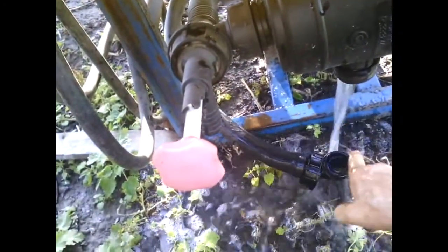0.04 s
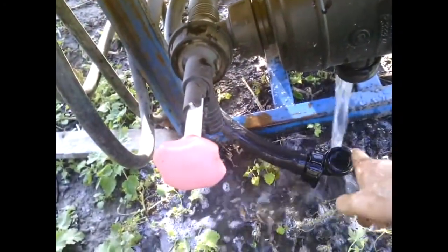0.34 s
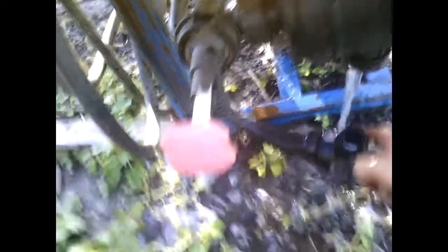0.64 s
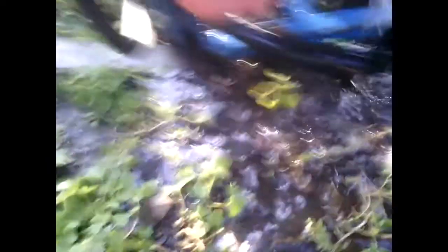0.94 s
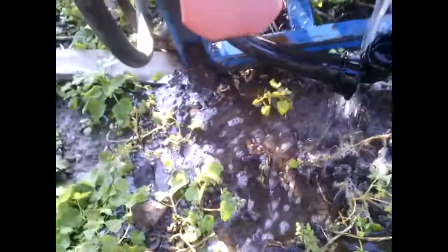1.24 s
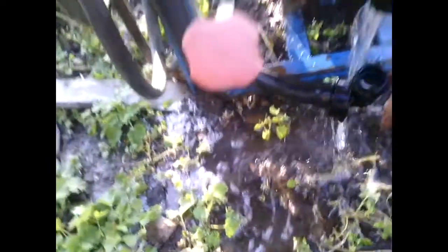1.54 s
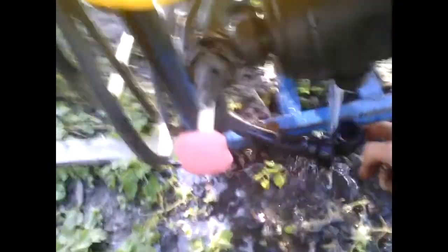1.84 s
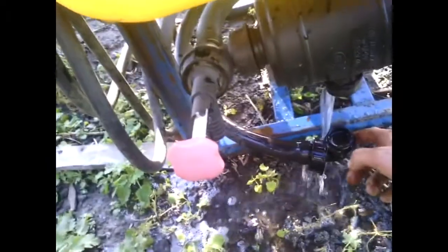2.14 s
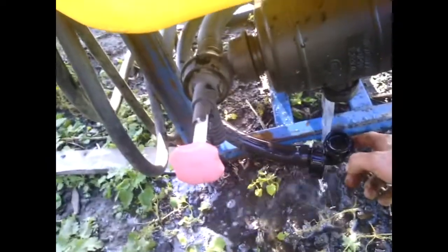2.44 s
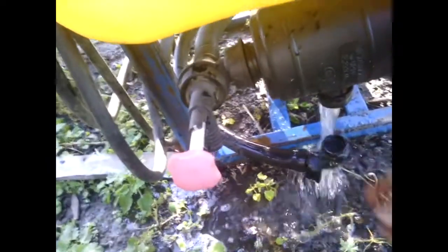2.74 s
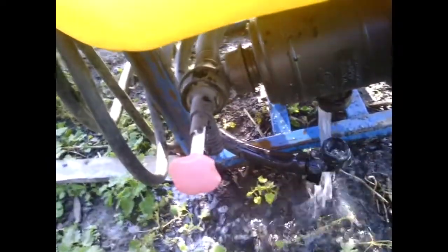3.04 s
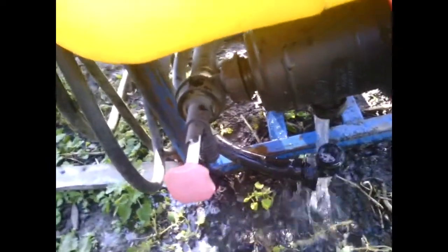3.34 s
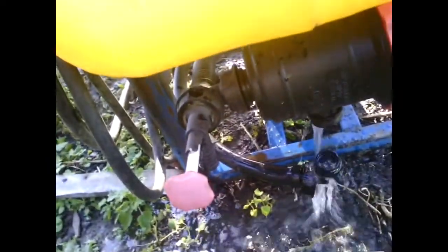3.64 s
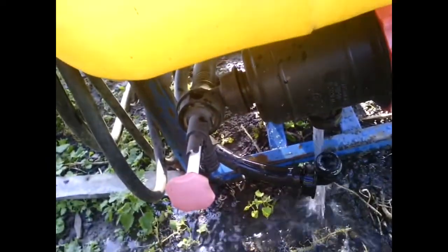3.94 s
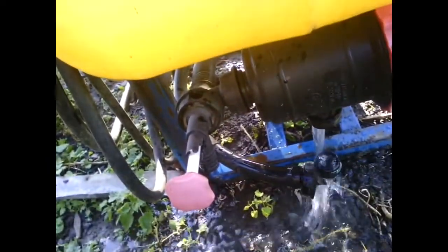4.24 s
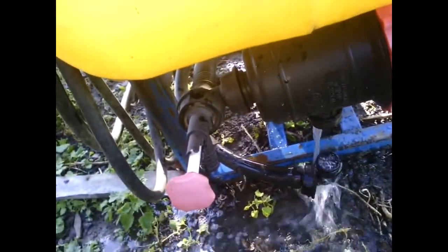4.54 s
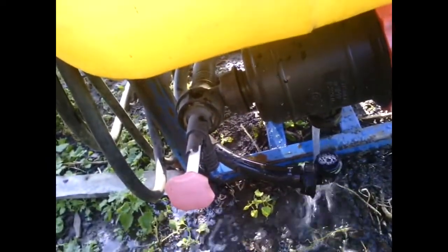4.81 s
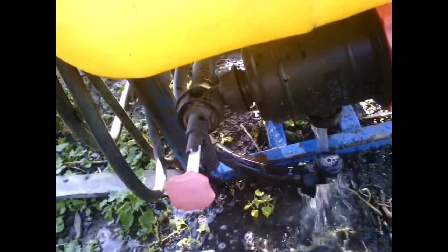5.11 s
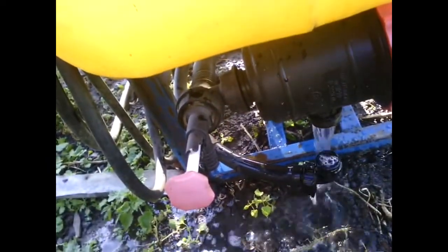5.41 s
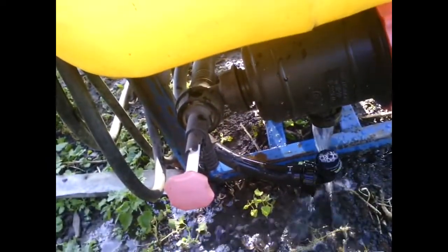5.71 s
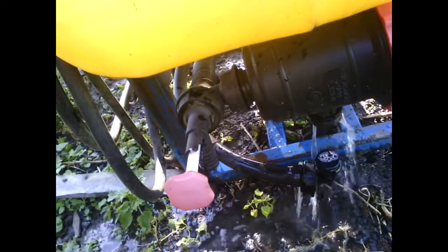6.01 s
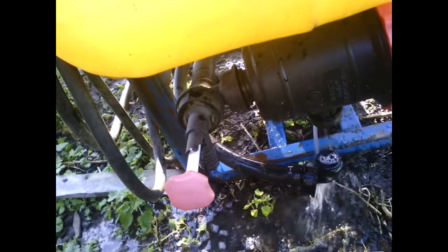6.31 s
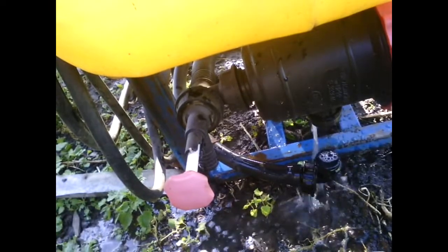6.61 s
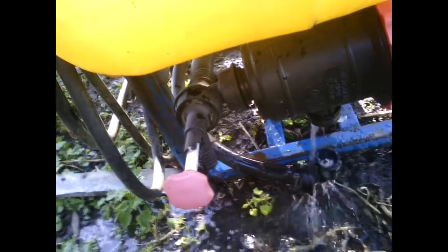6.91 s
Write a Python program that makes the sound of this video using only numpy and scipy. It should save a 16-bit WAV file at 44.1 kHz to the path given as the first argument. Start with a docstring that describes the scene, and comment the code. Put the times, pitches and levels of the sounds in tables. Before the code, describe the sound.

A close, uneven stream of water patters and splashes on wet ground throughout, ringing slightly as it strays into a hose mouth and over a fitting. Early on comes a quick cluster of handling clicks on the microphone, then one more knock. Later, faint hollow plastic booms and small bubbling plops join the splashing, while light wind gives short low thumps in the quiet outdoor air.

```python
"""Outdoors on wet soil, water runs out of an opened pump filter. The jet breaks on a hose fitting and
spatters on the ground, big lumps of water slap down, and bubbles ring in a puddle.
Fingers knock on a hand-held camera and its case rings; light wind puffs on the microphone.
A hollow plastic part booms softly now and then, and something whistles faintly far away."""
import sys
import numpy as np
from scipy import signal
from scipy.fft import rfft, irfft, next_fast_len
from scipy.io import wavfile
from scipy.ndimage import uniform_filter1d, map_coordinates

SR = 44100
rng = np.random.default_rng(int(sys.argv[2]) if len(sys.argv) > 2 else 0)


def generate_wav(sig):
    """Save sig (samples, or channels by samples) to the path in sys.argv[1] as 16-bit PCM at SR."""
    pcm = np.round(np.clip(np.atleast_2d(sig).T, -1, 1) * 32767).astype(np.int16)
    wavfile.write(sys.argv[1], SR, pcm)


N = 306936

# A tone table sets the balance of low and high sound. A ring time is the time to fade by 60 dB.
# tone of the outdoor air: frequency_hz, level_db
AIR_TONE = [(20, -13), (70, 5), (150, 0), (400, 2), (1000, -6.5), (4000, -7.5), (10000, -5.5), (14000, -6),
            (16000, -7.5)]
# tone of a faint, bright hiss: frequency_hz, level_db
HISS_TONE = [(200, 2), (2000, -5), (5500, -9), (9000, 6.5), (14000, 12.0)]
# the far whistle: time_s, pitch_hz, level_db
WHISTLE_PATH = [(3.965, 1520, -61), (4.02, 1503, -60.5), (4.22, 1500, -64.5), (4.29, 1514, -71),
                (4.36, 1506, -61), (4.51, 1524, -62)]

# tone of wind on the microphone: frequency_hz, level_db
WIND_TONE = [(20, -46), (40, -28), (70, 0.5), (120, -0.5), (200, -6), (300, -22), (500, -63), (1000, -52)]
# breaths of wind: start_s, length_s, level_db
WIND_GUSTS = [(0.8, 0.29, -57.5), (1.98, 0.11, -58), (2.33, 0.12, -68), (3.06, 0.27, -58),
              (3.85, 0.13, -59), (4.5, 0.22, -65), (4.92, 0.22, -57.5), (5.44, 0.15, -53.5),
              (6.5, 0.75, -55.5)]
# short low thumps on the microphone (puffs of wind and a dull handling bump): time_s, level_db, pitch_hz
LOW_THUMPS = [(0.891, -33, 132), (0.997, -29, 111), (1.039, -22, 220), (2.123, -35, 104),
              (3.058, -30.5, 138), (3.091, -28, 390), (3.105, -28.5, 303), (3.129, -27, 210),
              (3.186, -32.5, 119), (3.331, -43, 134), (3.882, -35, 133), (3.925, -35, 145), (4.13, -42, 92),
              (4.641, -38, 110), (4.669, -33.5, 125), (5, -26, 143), (5.106, -33.5, 124), (5.43, -30, 122),
              (5.462, -33, 125), (5.511, -32.5, 134), (5.528, -40, 90), (5.55, -33, 161),
              (6.515, -30.5, 160), (6.54, -35, 115), (6.564, -37, 90), (6.617, -33, 142), (6.645, -36, 105),
              (6.688, -24.5, 128), (6.775, -40, 105), (6.809, -30, 180), (6.849, -36, 132),
              (6.936, -34, 189), (6.948, -37, 96)]

# tone of the plastic part's hum: frequency_hz, level_db
HUM_TONE = [(150, -19), (255, -15), (298, -3.0), (335, -15.0), (400, -22), (700, -32.5)]
# notes the plastic part rings at: pitch_hz, level_db, ring_s
PLASTIC_NOTES = [(296, 11, 0.36), (272, -17, 0.59), (320, 5, 0.1)]
# its soft booms: start_s, level_db, rise_s
PLASTIC_BOOMS = [(3.279, -48.5, 0.0069), (3.479, -65, 0.013), (3.801, -51, 0.0077), (4.107, -53.5, 0.013),
                 (4.675, -42, 0.014), (5.141, -48, 0.0086), (5.39, -53, 0.01), (5.74, -51, 0.019)]

# fingers knocking on the camera: start_s, click_db, case_db, treble_limit_hz
FINGER_KNOCKS = [(.930, -26, -26.5, 5000), (0.9724, -17.5, -40, 12100), (0.9775, -20, -38, 6000),
                 (0.9836, -25, -44, 9000), (0.993, -25, -37, 5000), (0.997, -12, -27, 4000),
                 (1.034, -25, -26, 4000), (1.043, -26, -29, 12000), (1.044, -2, -19.5, 13600),
                 (1.063, -24.5, -35.5, 6000), (1.117, -45, -41, 5000), (1.9791, -18.5, -21.5, 3500)]
# notes in a finger's click: pitch_hz, level_db, ring_s
CLICK_NOTES = [(1330, -8, 0.0063), (2120, 3.5, 0.0032), (4100, 7.5, 0.0028), (5110, -1.5, 0.0037),
               (6470, -4.5, 0.0042), (7400, -7, 0.0037), (10650, -9, 0.0019)]
# notes the camera's case rings at: pitch_hz, level_db, ring_s
CASE_NOTES = [(339.4, 7, 0.12), (303, -12, 0.086), (490, -6, 0.0093), (744, 7, 0.016), (1046, -5.5, 0.027)]
# the hand shifts its grip: start_s, length_s, level_db
GRIP_RUBS = [(0.79, 0.29, -55.5), (1.7, 0.31, -59), (3.09, 0.048, -56), (6.53, 0.039, -58.5)]
# tone of that rubbing: frequency_hz, level_db
RUB_TONE = [(120, -29), (270, -13), (335, 1.5), (420, -15.5), (600, -10.5), (1000, -5.5), (1400, -24),
            (3000, -45)]
# a finger drags past the microphone: start_s, length_s, level_db
FINGER_SCRAPES = [(0.981, 0.004, -39), (1.010, 0.007, -40), (1.036, 0.005, -38)]
# tone of that scraping: frequency_hz, level_db
SCRAPE_TONE = [(300, -2), (1000, -3), (2500, -3), (5000, -3), (6500, -8), (8500, -5), (14000, -35)]

# large bubbles closing in the puddle: start_s, level_db, pitch_hz, climb_share_per_s
BIG_BUBBLES = [(2.162, -48, 1415, 2.3), (3.018, -41.5, 1486, 2.9), (3.1384, -39.5, 2155, 4.3),
               (4.3943, -38, 2400, 3.9), (4.415, -44, 1570, 4.3), (4.435, -44.5, 1110, 1),
               (4.534, -46, 1525, 3.7), (4.694, -44.5, 1700, 2), (5.689, -41.5, 1405, 14.5),
               (6.168, -42, 2360, 3.4), (6.203, -43.5, 2610, 1.1)]
# the biggest lumps of water slapping down: start_s, peak_db, pitch_hz
BIG_SLAPS = [(0.053, -31, 3500), (0.159, -34, 4100), (0.167, -32, 3770), (0.4163, -34, 4200),
             (0.557, -29, 3150), (0.6256, -32, 2630), (0.6727, -32.5, 2180), (0.827, -32, 4130),
             (1.204, -23.5, 2675), (1.255, -27, 5070), (1.3114, -26, 4760), (1.315, -23.5, 4510),
             (1.325, -29, 4060), (1.4354, -27, 3970), (1.5062, -27, 3550), (1.7989, -22, 2900),
             (1.8025, -26, 3300), (1.855, -31, 4000), (1.9125, -29, 4180), (2.058, -29.5, 3930),
             (2.104, -29.5, 4040), (2.139, -36, 4100), (2.1683, -33, 5870), (2.1834, -31, 2890),
             (2.2114, -31.5, 4000), (2.3175, -27.5, 3770), (2.505, -25, 3950), (2.5471, -28.5, 3850),
             (2.742, -28, 4230), (2.763, -30.5, 2950), (2.7958, -26.5, 6400), (2.8393, -31, 5050),
             (2.898, -30, 5330), (3.1056, -28.5, 4200), (3.2132, -27.5, 4300), (3.38, -28, 3160),
             (3.4552, -24, 3930), (3.5771, -25.5, 3170), (3.9032, -29.5, 4860), (3.943, -28, 6470),
             (4.0238, -26, 4800), (4.175, -26, 4180), (4.278, -26, 3550), (4.315, -28.5, 4540),
             (4.329, -22, 3520), (4.375, -29.5, 4490), (4.512, -30, 5270), (4.525, -23.5, 3240),
             (4.5983, -28, 2770), (4.668, -32, 3950), (4.7544, -30, 4300), (4.775, -29, 3550),
             (4.78, -31, 3670), (5.078, -32, 3980), (5.091, -34, 4080), (5.1974, -35, 3360),
             (5.3165, -25, 4520), (5.4362, -32.5, 3330), (5.5107, -30.5, 3160), (5.8114, -33, 3800),
             (5.9535, -28.5, 4540), (5.988, -29, 4200), (6.05, -30.5, 4130), (6.0955, -33.5, 4500),
             (6.251, -32.5, 4020), (6.311, -35, 5900), (6.3675, -33, 4600), (6.4835, -29.5, 4240),
             (6.68, -30, 3200), (6.782, -24.5, 3900), (6.8194, -30, 5750)]

# how loudly the jet lands: time_s, soil_db, puddle_db
JET_LEVELS = [(0.0, -47, -62), (0.56, -49, -61), (0.97, -43, -66), (1.25, -44.5, -71), (1.55, -48, -61.5),
              (1.96, -44, -71), (2.34, -47.5, -63), (2.79, -45.5, -57), (2.95, -43.5, -51),
              (3.2, -43, -56.5), (3.45, -44.5, -54.5), (3.7, -43, -58), (3.95, -46, -60),
              (4.27, -45.5, -56), (4.48, -43, -61.5), (4.79, -48, -61.5), (5.1, -43, -54.5),
              (5.3, -44, -61.5), (5.5, -47.5, -61.5), (5.65, -50.5, -62), (5.82, -48, -59), (6.2, -50, -65),
              (6.56, -52.5, -61.5), (6.96, -47, -53)]
# tone of the spatter on the soil: frequency_hz, level_db
SPATTER_TONE = [(940, -15), (1600, -6), (2300, -6), (3220, -0.5), (3690, 0), (4220, 0.5), (5710, -6),
                (6480, -4.5), (8490, -12.5), (12000, -18), (15600, -51), (22000, -120)]
# tone of the low splash in the puddle: frequency_hz, level_db
PUDDLE_TONE = [(150, -13), (450, 0.5), (800, 2), (1300, 0.5), (1900, 4), (2600, 0.5), (5000, -37)]
# tone of the fine spray: frequency_hz, level_db
SPRAY_TONE = [(3000, -12), (5500, -2), (7000, -5.5), (9000, -11), (12000, -22), (16000, -23)]
# the jet spurts: start_s, length_s, strength_db
JET_SPURTS = [(3.08, 0.06, -8), (4.25, 0.046, 2), (4.665, 0.06, 4)]
# the jet falters: start_s, length_s, lost_share_db
JET_LULLS = [(2.43, 0.062, -20), (3.3, 0.042, -5), (4.09, 0.06, -7), (4.81, 0.085, -9), (5.37, 0.051, -9),
             (6.28, 0.04, -3), (6.39, 0.04, -9.5)]
# the jet tears into separate drops: start_s, length_s, added_share_db
JET_DRIBBLES = [(2.05, 0.41, -8), (5.95, 0.28, -3)]
# the jet strays into the hose mouth: start_s, length_s, share_db
JET_IN_HOSE = [(0.0, 0.78, -9), (2.0, 0.79, -1.5)]
# notes the hose mouth rings at: pitch_hz, width_hz, level_db
HOSE_NOTES = [(2870, 120, -1), (3330, 150, -3), (4080, 140, 2.5), (5070, 500, -5), (6300, 320, -6)]
# the jet breaks on the fitting: start_s, length_s, share_db
JET_ON_FITTING = [(3.4, 1.32, -3.5), (5.4, 1.7, -2)]
# notes the fitting's hollows ring at: pitch_hz, width_hz, level_db
FITTING_NOTES = [(2520, 160, -0.5), (3245, 160, 4.5), (4100, 230, -7), (4660, 570, -3), (5570, 810, -7),
                 (6470, 740, 2.5)]
# the jet glances off the fitting as fine spray: start_s, length_s, level_db
SPRAY_BURSTS = [(3.52, 0.089, -55.5), (4.25, 0.11, -53.5), (4.67, 0.055, -52), (5.22, 0.043, -52.5),
                (5.73, 0.17, -63.5), (5.98, 0.015, -49)]


def amp(db):
    """Turn decibels into a number to multiply by."""
    return 10 ** (np.asarray(db) / 20)


def unit(x):
    """Scale a sound to an average strength (rms) of 1."""
    return x / np.sqrt(np.mean(x ** 2) + 1e-20)


def curves(rows):
    """Join a table's points with lines: one curve for each column after the time."""
    times, *columns = np.transpose(rows)
    return [np.interp(np.arange(N) / SR, times, column) for column in columns]


def during(rows):
    """Fade in at a table's first time and out by its last."""
    t = np.arange(N) / SR
    return np.clip(np.minimum(t - rows[0][0], rows[-1][0] - t) / 0.022, 0, 1)


def wobble(rate):
    """A smooth curve through rate random points a second."""
    points = rng.standard_normal(int(N * rate / SR) + 4)
    return map_coordinates(points, [np.arange(N) * rate / SR])


def add(track, s, sound):
    """Mix a sound into a track, starting at s seconds."""
    part = track[max(round(s * SR), 0):][:len(sound)]
    part += sound[:len(part)]


def swells(rows, attack, release):
    """A loudness curve for events that rise, hold and die away; attack and release are in seconds."""
    out = np.zeros(N)
    for s, length, db in rows:
        t = np.arange(max(s - 10 * attack, 0), s + length + 10 * release, 1 / SR)
        shape = np.exp(np.minimum(t - s, 0) / attack - np.maximum(t - s - length, 0) / release)
        add(out, t[0], amp(db) * shape)
    return out


def filtered(x, response):
    """Turn each frequency of a sound up or down by response(hz)."""
    size = next_fast_len(N + 8192)
    return irfft(rfft(x, size) * response(np.fft.rfftfreq(size, 1 / SR)), size)[..., :N]


def coloured(x, tone):
    """Shape a sound with a tone table, at strength 1."""
    points_hz, db = np.transpose(tone)
    return unit(filtered(x, lambda hz: amp(np.interp(np.log(hz + 1), np.log(points_hz), db))))


def noise(tone):
    """Noise with the given tone, at strength 1."""
    return coloured(rng.standard_normal(N), tone)


def patchy(x, depth_db):
    """Make patches of pitch flicker, as when air pockets open and close in a splash."""
    bands = signal.stft(x, nperseg=512)[2]
    patches = uniform_filter1d(rng.standard_normal(bands.shape), 5, axis=0)
    patches = uniform_filter1d(patches, 6, axis=1)
    return unit(signal.istft(bands * amp(depth_db * unit(patches)), nperseg=512)[1][:N])


def blend(a, b, share):
    """Mix two sounds at a steady power; share is the part given to b."""
    share = np.clip(share, 0, 1)
    return np.sqrt(1 - share) * a + np.sqrt(share) * b


def ring(notes, rise_s, length=SR // 2):
    """A struck object's notes build up and die away, with a peak of 1."""
    t = np.arange(length) / SR
    sound = sum(amp(db - 60 * t / ring_s) * np.sin(2 * np.pi * hz * t) for hz, db, ring_s in notes)
    sound *= 1 - np.exp(-(t / rise_s) ** 2)
    return sound / np.abs(sound).max()


def resonate(x, notes):
    """A hollow space favours the parts of a sound near its own notes."""
    def response(f):
        return sum(amp(db) * 1j * f * width / (hz * hz - f * f + 1j * f * width)
                   for hz, width, db in notes)
    return unit(filtered(x, response))


def background():
    """Quiet outdoor air, a far whistle and the thin whine of the camera's electronics."""
    hz, db = curves(WHISTLE_PATH)
    whistle_gain = amp(db + 2 + 2.2 * wobble(40)) * during(WHISTLE_PATH)
    wavering_hz = hz * (1 + 0.009 * wobble(90))
    whistle = whistle_gain * unit(np.sin(2 * np.pi * np.cumsum(wavering_hz) / SR))
    whine = amp(-78.5) * np.sin(2 * np.pi * 12897 * np.arange(N) / SR)
    air = amp(-59.0) * patchy(noise(AIR_TONE), depth_db=2.0)
    return air + whistle + whine


def wind_and_thumps():
    """Gusts rumble; puffs of wind and a dull handling bump give short, low thumps on the microphone."""
    thumps, thump_rumble = np.zeros(N), np.zeros(N)
    t = np.arange(-SR // 20, SR // 20) / SR
    for s, db, hz in LOW_THUMPS:
        wave = np.cos(2 * np.pi * (hz * t + rng.uniform()))
        add(thumps, s + t[0], amp(db - 3.5) / np.cosh(t * hz / 0.29) * wave)
        add(thump_rumble, s + t[0], amp(db - 35) * np.hanning(len(t)))
    calm = amp(-72.5)
    gusts = swells(WIND_GUSTS, attack=0.051, release=0.042)
    rumble = (calm + gusts + thump_rumble) * unit(noise(WIND_TONE) * amp(4.3 * wobble(30)))
    bass_cut = signal.butter(3, 48, "highpass", fs=SR, output="sos")  # a tiny microphone misses deep bass
    return signal.sosfilt(bass_cut, thumps + rumble)


def sloshing(x, bend, rate):
    """Moving water sways a pitch by about the share bend, rate times a second."""
    drift = signal.lfilter([1], [1, -np.exp(-10 / SR)], bend * wobble(rate))
    return map_coordinates(x, [np.arange(N) + drift], mode="mirror")


def hollow_plastic():
    """A hollow plastic part hums along with the puddle's splash and booms when water nudges it."""
    puddle_db = curves(JET_LEVELS)[1]
    average_db = puddle_db.mean()
    out = amp(average_db - 9 + 1.43 * (puddle_db - average_db)) * noise(HUM_TONE)
    for s, db, rise_s in PLASTIC_BOOMS:
        add(out, s, amp(db) * ring(PLASTIC_NOTES, rise_s))
    return sloshing(out, bend=0.025, rate=58) * amp(2.5 * wobble(45))  # the level gurgles too


def fingers_on_camera():
    """Fingers click on the camera, rub it and scrape it; its case rings dully."""
    knocks, t = np.zeros(N), np.arange(SR // 8) / SR
    for s, click_db, case_db, treble_limit_hz in FINGER_KNOCKS:
        notes = [(hz * np.exp(rng.normal(0, 0.04)), db, ring_s) for hz, db, ring_s in CLICK_NOTES]
        click = ring(notes, rise_s=0.0004, length=len(t))
        scuff = amp(-25.0 - 60 * t / 0.02) * rng.standard_normal(len(t))
        soft_fingertip = signal.butter(2, treble_limit_hz, fs=SR)  # dulls the click
        touch = signal.lfilter(*soft_fingertip, click + scuff)
        case = ring(CASE_NOTES, rise_s=0.00072, length=len(t))
        add(knocks, s, amp(click_db) * touch / np.abs(touch).max() + amp(case_db) * case)
    rub = swells(GRIP_RUBS, attack=0.033, release=0.037) * noise(RUB_TONE)
    rough_skin = unit(noise(SCRAPE_TONE) * amp(2.3 * wobble(630)))
    scrape = swells(FINGER_SCRAPES, attack=0.002, release=0.003) * rough_skin
    return knocks + rub + scrape


def bubbles(ring_s=0.09):
    """A bubble's pitch climbs as it nears the surface of the shallow puddle."""
    out, t = np.zeros(N), np.arange(SR // 25) / SR
    for s, db, hz, climb in BIG_BUBBLES:
        phase = 2 * np.pi * hz * t * (0.98 + climb * t / 2)
        ripple = np.cumsum(rng.normal(0, 0.11, len(t)))  # the churning puddle jostles the bubble
        loudness = amp(db - 60 * t / ring_s) * (1 - np.exp(-t / 0.00029))
        add(out, s, loudness * np.sin(phase + ripple))
    return out


def slaps(rows, climb_share_per_s=7.3):
    """Each lump of water smacks the ground, rings a small air pocket and scatters droplets."""
    out, t = np.zeros(N), np.arange(SR // 16) / SR
    splash_band = signal.butter(3, [2200, 5800], "bandpass", fs=SR, output="sos")
    for s, db, hz in rows:
        white = rng.standard_normal((2, len(t)))
        near_pitch = signal.lfilter(*signal.iirpeak(hz, 2, SR), white[0])
        churn = unit(signal.lfilter(*signal.iirpeak(hz, 5, SR), near_pitch))
        splash = unit(signal.sosfilt(splash_band, white[1]))
        ring_s = 0.0084 * np.exp(0.54 * rng.standard_normal())  # no two pockets last alike
        chirp = np.sin(2 * np.pi * hz * t * (1 + climb_share_per_s * t / 2))
        pocket = amp(-60 * t / ring_s) * (0.45 * churn + chirp)
        smack = amp(-5.5 - 60 * t / 0.004) * splash
        scatter = amp(-18 - 60 * t / 0.075) * (splash + churn)
        slap = pocket * (1 - np.exp(-t / 0.00027)) + (smack + scatter) * (1 - np.exp(-t / 0.0009))
        add(out, s + 0.0017, amp(db) * slap / np.abs(slap).max())
    return out


def small_slaps(per_s=6, typical_hz=4130):
    """Smaller lumps of water fall at random, louder with the flow up to a limit."""
    soil_db = np.minimum(curves(JET_LEVELS)[0], -47)  # a fast jet tears its lumps finer
    count = int(per_s * N / SR)
    timing, size, pitch = rng.uniform(-1.1, 1, (count, 3)).T
    at = ((np.arange(count) + (1 + timing) / 2) * N / count).astype(int)
    return slaps(zip(at / SR, soil_db[at] + 11 + 3 * size, typical_hz * np.exp(0.336 * pitch)))


def droplets(tone, rate, hz, spread, cycles, size_db, scatter_s, count=3):
    """Water lands in rate lumps a second; each traps count tiny bubbles that ring at similar pitches."""
    lumps = int(rate * N / SR)
    total = lumps * count
    lump_s = np.repeat((np.arange(lumps) + rng.uniform(-1, 1, lumps)) / rate, count)
    start_s = lump_s + rng.exponential(scatter_s, total)
    pitch_offset = np.repeat(rng.standard_normal(lumps), count) + 0.5 * rng.standard_normal(total)
    pitch_hz = np.clip(hz * np.exp(spread * pitch_offset), 400, 13000)
    lump_size = np.repeat(np.minimum(rng.exponential(1, lumps), 2.5), count)
    gain = amp(size_db * (lump_size + np.minimum(rng.exponential(1, total), 2.5)))
    fade_cycles = cycles * np.exp(0.5 * rng.standard_normal(total))
    sample = np.arange(256)
    progress = sample / len(sample)
    turns = pitch_hz[:, None] * sample / SR * (1 + 0.077 * progress)  # the pitch climbs a little
    shape = np.minimum(turns / 0.62, 1) * np.exp(-turns / fade_cycles[:, None]) * (1 - progress)
    pings = (gain * rng.choice([-1, 1], total))[:, None] * shape * np.sin(2 * np.pi * turns)
    at = (np.abs(start_s) * SR).astype(int)[:, None] + sample
    return coloured(unit(np.bincount(at.ravel(), pings.ravel(), N)[:N]), tone)


def filling_hollow(splash, notes, share, bend=0.06):
    """A share of the splash rings in a hollow whose pitch wanders as it fills and spills."""
    fill = np.clip(1 + wobble(13), 0, 2)
    ringing = np.zeros(N)
    for stage in range(3):  # drained, half full, flooded
        shifted = [(hz * (1 + bend * (stage - 1)), width, db) for hz, width, db in notes]
        ringing += np.clip(1 - np.abs(fill - stage), 0, 1) * resonate(splash, shifted)
    share = np.clip(share, 0, 1)
    return (1 - share) * splash + share * unit(ringing)


def jet_thinning(lead_s=0.0095, lost_share_db=-16.5):
    """How much of the jet is left as it falters, and as it thins just before each big lump."""
    lulls = swells(JET_LULLS, attack=0.022, release=0.017)
    thin_spots = [(s - lead_s, lead_s, lost_share_db) for s, db, hz in BIG_SLAPS]
    return np.clip(1 - lulls - swells(thin_spots, attack=0.012, release=0.0026), 0, 1)


def spatter(flow_db):
    """Droplets patter over a wash of finer ones; some ring in the fitting and the hose mouth."""
    drops = droplets(SPATTER_TONE, rate=420, hz=4250, spread=0.37, cycles=6.5, size_db=2, scatter_s=0.002)
    dense = patchy(drops + amp(-4.5) * noise(SPATTER_TONE), depth_db=3.0)
    drips = droplets(SPATTER_TONE, rate=53, hz=4780, spread=0.328, cycles=11, size_db=3,
                     scatter_s=0.00067)
    dribble = swells(JET_DRIBBLES, attack=0.078, release=0.13) ** 2
    splash = blend(dense, drips, 0.053 + 0.33 * flow_db + dribble)  # more separate drips when loud
    on_fitting = swells(JET_ON_FITTING, attack=0.065, release=0.15) ** 2
    in_hose = swells(JET_IN_HOSE, attack=0.1, release=0.08) ** 2
    splash = filling_hollow(splash, FITTING_NOTES, on_fitting)
    return filling_hollow(splash, HOSE_NOTES, in_hose)


def water_jet(ordinary_db=-44):
    """The falling jet spatters on the soil, plops into the puddle and throws off fine spray."""
    soil_db, puddle_db = curves(JET_LEVELS)
    flow_db = soil_db - ordinary_db
    surge = wobble(40)  # the jet breaks up unevenly
    spurts = 1 + 0.44 * swells(JET_SPURTS, attack=0.0045, release=0.014)
    soil = amp(soil_db - 0.96 + 1.5 * surge) * spurts * jet_thinning() * spatter(flow_db)
    plops = droplets(PUDDLE_TONE, rate=260, hz=1534, spread=0.484, cycles=6.7, size_db=2.5,
                     scatter_s=0.004)
    low_splash = patchy(plops + amp(4.5) * noise(PUDDLE_TONE), depth_db=3.0)
    puddle = amp(puddle_db - 0.5 + 1.6 * surge) * low_splash
    mist = droplets(SPRAY_TONE, rate=240, hz=7310, spread=0.257, cycles=13.6, size_db=4,
                    scatter_s=0.0021, count=5)
    bursts = swells(SPRAY_BURSTS, attack=0.014, release=0.014)
    spray = (amp(-56 + 0.2 * flow_db + 0.68 * surge) + bursts) * mist
    return soil + puddle + spray


def scene():
    """Both channels carry the same sound, plus a faint, bright hiss that differs left and right."""
    water = water_jet() + slaps(BIG_SLAPS) + bubbles()
    surroundings = fingers_on_camera() + hollow_plastic() + wind_and_thumps() + background()
    mono = water + surroundings + small_slaps()
    return mono + amp(-80.5) * np.array([noise(HISS_TONE), noise(HISS_TONE)])


def record(dry):
    """The camera cuts off the very highest treble."""
    return filtered(dry, lambda hz: hz < 15650)


dry = scene()
out = record(dry)
generate_wav(out)
```